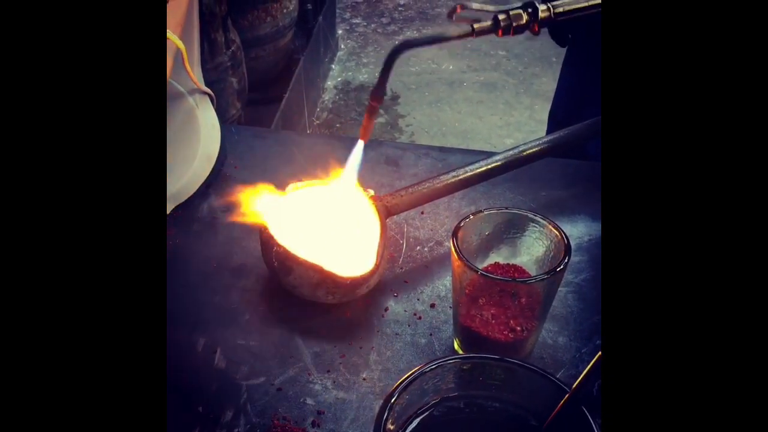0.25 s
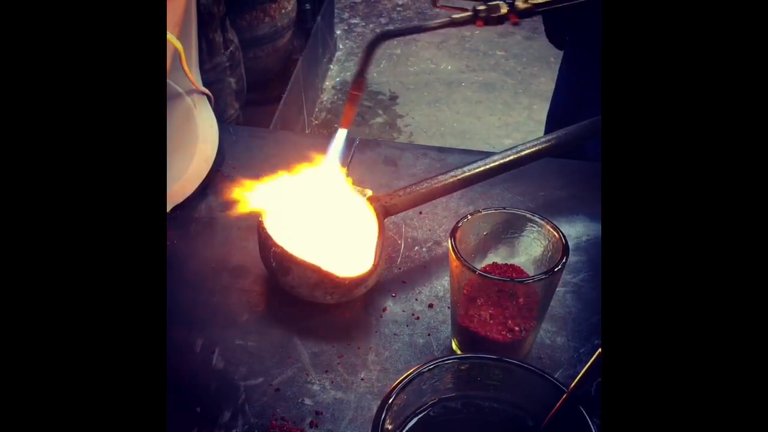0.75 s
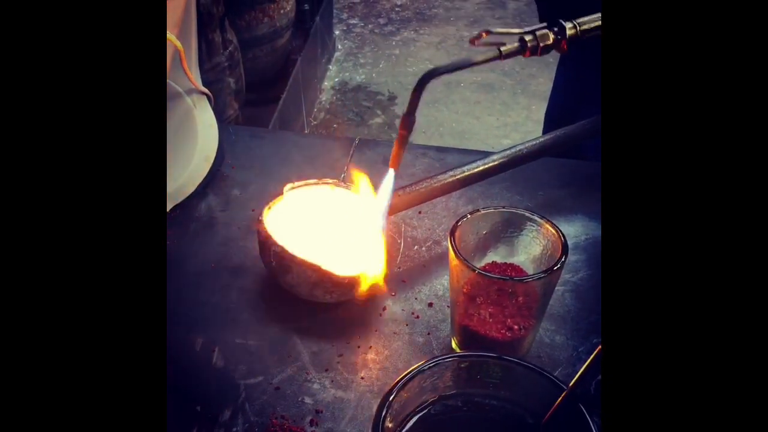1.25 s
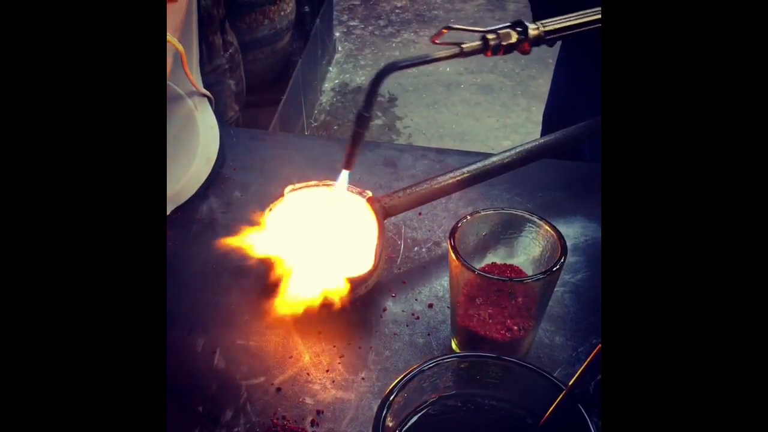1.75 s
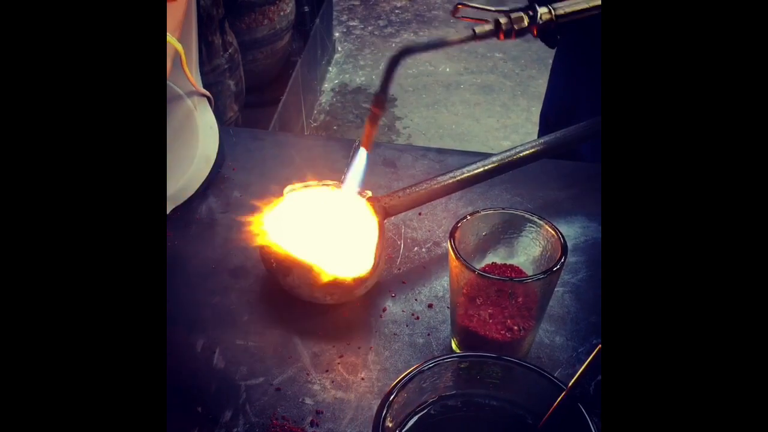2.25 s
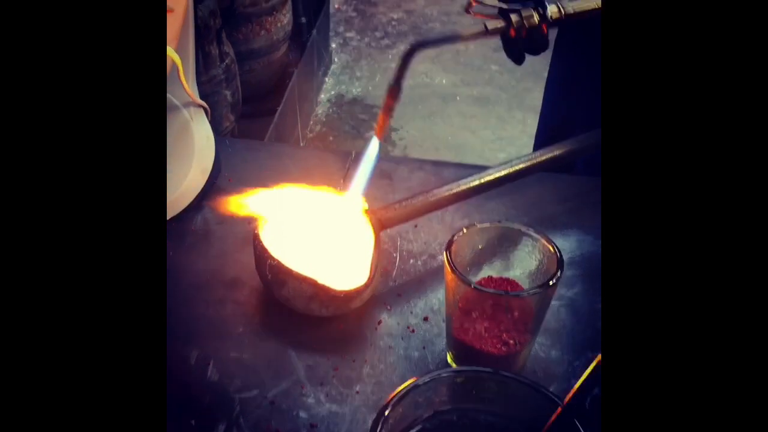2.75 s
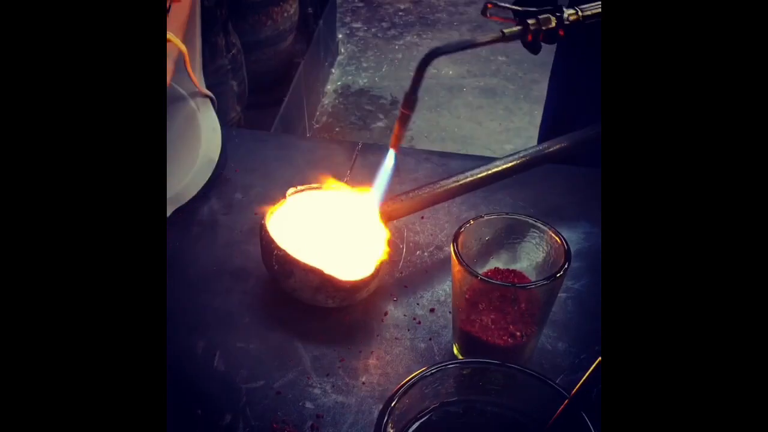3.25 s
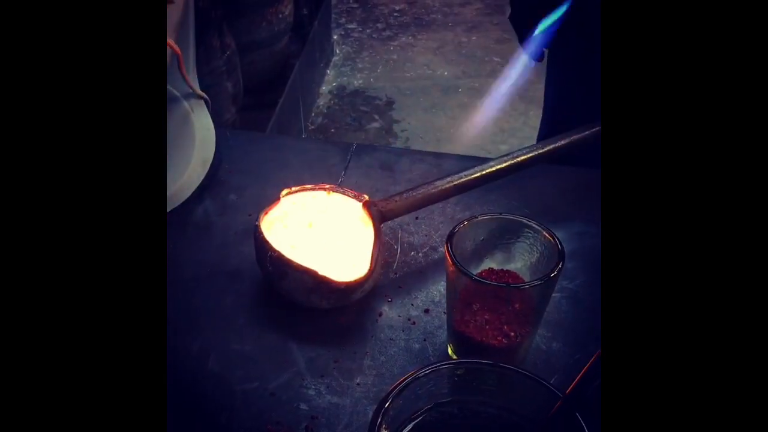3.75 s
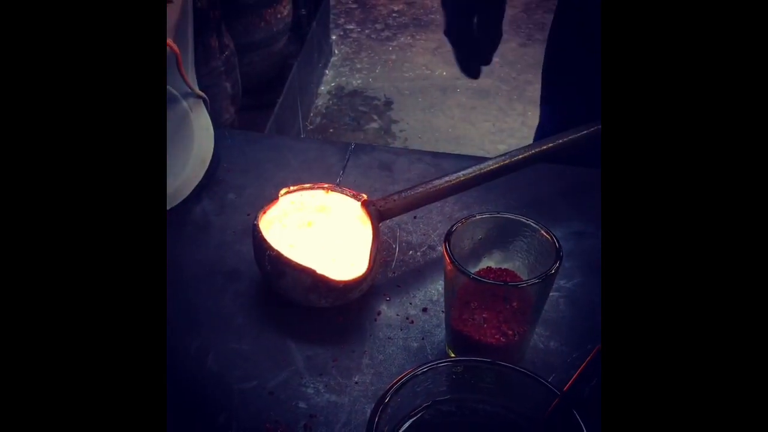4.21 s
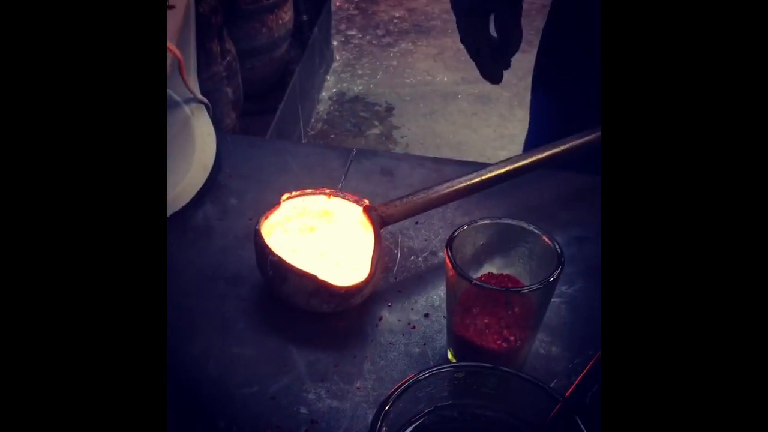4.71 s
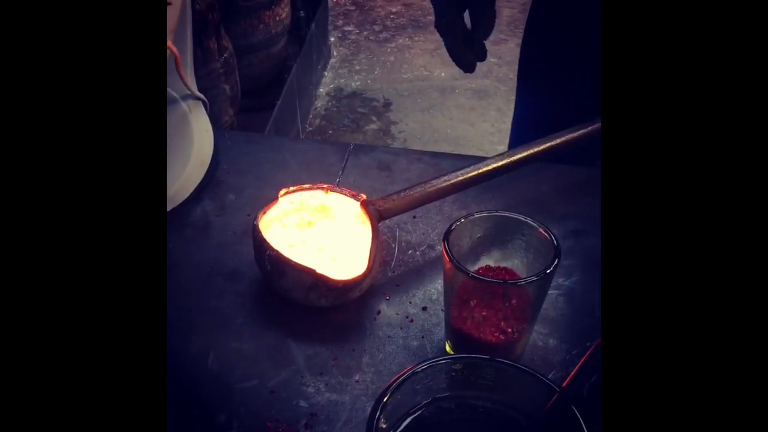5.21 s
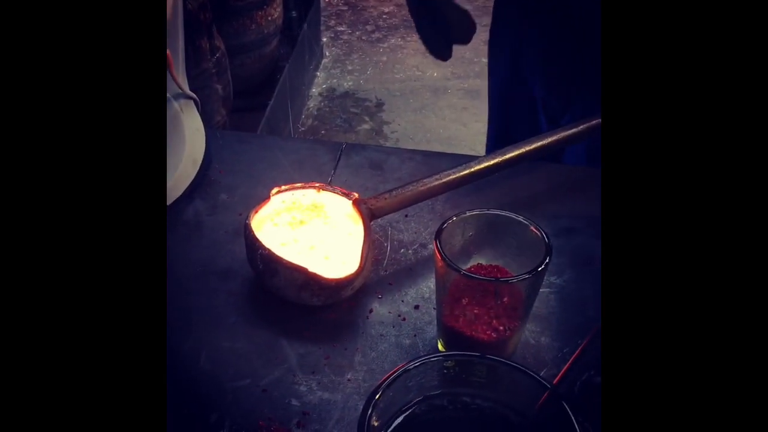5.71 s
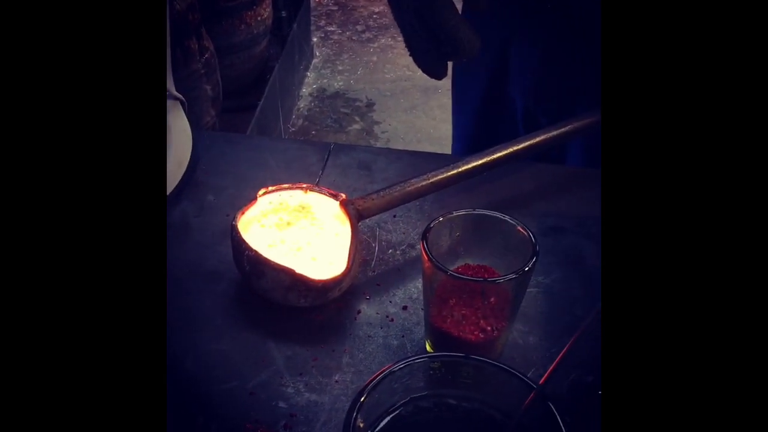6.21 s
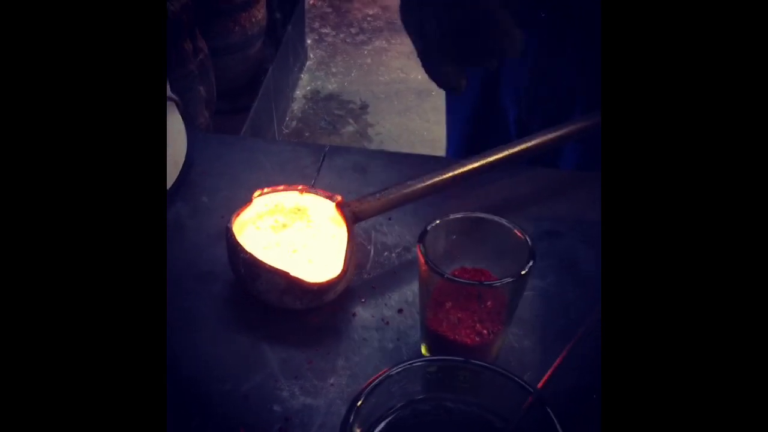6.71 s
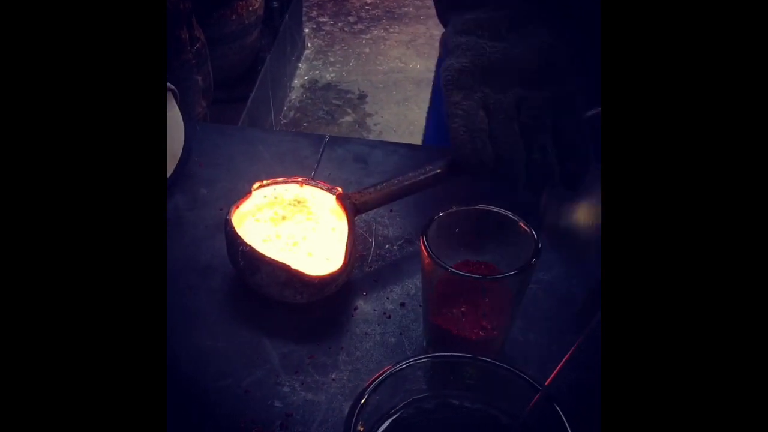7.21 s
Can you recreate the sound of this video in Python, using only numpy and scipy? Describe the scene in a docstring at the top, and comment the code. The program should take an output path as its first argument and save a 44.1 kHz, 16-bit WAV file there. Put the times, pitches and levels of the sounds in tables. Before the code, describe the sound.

A strong, patchy jet of burning gas dominates, with fizzy splashes and wandering whistly colouring. After almost four seconds the flame leaves the bowl and the hiss sweeps through bench and wall reflections. A soft puff drops it to a thin hiss, further puffs end it, and only deep furnace rumble and faint shop air remain until a small cluster of high squeaks and sharp ticks. Mono, slightly boxed microphone, treble cut off at the very top.

```python
"""A metal shop: on a steel bench a gas torch hisses into a glowing crucible and splashes as it circles the rim.
It is lifted away and its two valves are shut in turn; a furnace rumbles throughout, and a metal fitting
squeaks and ticks at the end. Torch, furnace and far shop hiss are shaped noise; valve puffs and ticks are
dying noise bursts, squeaks are unsteady sines. One microphone in a housing, both channels alike."""
import sys
import numpy as np
from scipy import signal
from scipy.fft import rfft, irfft, next_fast_len
from scipy.io import wavfile
from scipy.ndimage import uniform_filter1d, map_coordinates

SR = 44100
rng = np.random.default_rng(int(sys.argv[2]) if len(sys.argv) > 2 else 0)


def materialize(psi):
    """Save the field psi as 16-bit PCM at rate SR to the path in sys.argv[1].

    A 1-D psi becomes a single channel; in a 2-D psi each row is a channel.
    """
    bounded = np.clip(np.atleast_2d(psi).T, -1, 1)
    quanta = np.round(bounded * 32767).astype(np.int16)
    wavfile.write(sys.argv[1], SR, quanta)


def invert_db(x):
    """Field ratio 10**(x/20) for x, a level in decibels (scalar or array-like)."""
    u = np.asarray(x, float) / 20
    return 10 ** u


N = 328986  # samples, about 7.5 s


def unit(x):
    """Scaled to rms 1."""
    return x / np.sqrt(np.mean(x ** 2) + 1e-20)


def along(points, hz):
    """A colour of (Hz, dB) points, read on a log frequency axis."""
    point_hz, level_db = np.transpose(points)
    return np.interp(np.log(hz + 1), np.log(point_hz + 1), level_db)


def curves(rows, t):
    """Each column after the time, read at times t along straight lines."""
    start_s, *columns = np.transpose(rows)
    return [np.interp(t, start_s, column) for column in columns]


def bumps(rows, t):
    """Each column after time and half length, as a sum of smooth bells at times t."""
    centre_s, half_s, *columns = np.transpose(rows)
    bell = np.exp(-((t[:, None] - centre_s) / half_s) ** 2)
    return [bell @ column for column in columns]


def wobble(rate_hz):
    """A smooth random curve through rate_hz random knots a second."""
    knots = rng.standard_normal(int(N * rate_hz / SR) + 4)
    return map_coordinates(knots, [np.arange(N) * rate_hz / SR])


def noise(response):
    """Gaussian noise through a response of frequency, at rms 1."""
    size = next_fast_len(N)
    spectrum = rfft(rng.standard_normal(size)) * response(np.fft.rfftfreq(size, 1 / SR))
    return unit(irfft(spectrum, size)[:N])


def burst(length, colour):
    """A steady stretch of noise with the given gain per frequency, at rms 1."""
    return unit(irfft(rfft(rng.standard_normal(length)) * colour, length))


# hollowness of the jet below the edge, and two wandering resonances, in the bowl and after:
# start_s, hollowness (0 none, 1 full), low_ring_hz, low_ring_db, high_ring_hz, high_ring_db
HOLLOW_AND_RINGS = [(0, 0.54, 3280, 6, 4270, 2), (.3, 0.78, 3340, 3, 4200, 1.5),
                    (.5, 0.43, 3250, -2, 3970, 7), (.7, 0.87, 3120, 1, 4000, -1),
                    (.9, 0.57, 3020, 3, 3750, -3), (1.15, 0.32, 3165, 7.5, 3780, 8),
                    (1.35, 0.55, 3190, 7, 3940, 10.5), (1.5, 0.8, 3190, 4, 3900, 9),
                    (1.7, 0.5, 3030, 2, 4350, 4), (1.9, 0.37, 3300, 2.5, 4050, 1),
                    (2.1, .7, 3050, 10.5, 4200, 0), (2.3, 0.84, 3230, 4.5, 4300, -2),
                    (2.5, .9, 3350, 4, 4350, 4), (2.7, 0.8, 3170, 12, 4350, 0),
                    (2.9, 0.92, 3080, 2, 4300, 3), (3.3, 0.9, 3200, 3, 4070, 1),
                    (3.55, 0.46, 3070, 4, 4070, 4.5), (3.75, 0.55, 3450, 2, 3950, 1),
                    (3.9, 0.5, 3330, 3, 3900, 0), (4.1, 0.34, 3130, 3.5, 3700, -4),
                    (4.3, 0.03, 2780, 4, 3550, 1.5), (4.5, 0, 3030, 1, 3800, -2),
                    (4.7, 0.24, 2800, -6, 4130, -2), (4.9, 0.4, 2580, 5, 4400, 3),
                    (5.1, 0.26, 2880, 6, 4310, 6), (5.27, 0, 3040, 7, 4500, 1), (5.45, 0, 2600, 9, 3850, 0),
                    (5.75, 0.5, 2880, 9, 3850, 3)]
# a deeper wandering resonance of the jet: start_s, ring_hz, ring_db
DEEP_RING = [(0, 1940, 2.5), (.7, 1920, 2), (1.1, 2150, 5), (1.4, 2280, 2.5), (1.9, 2140, 2),
             (2.1, 2000, -5), (2.3, 2310, 3), (2.7, 1980, 5), (3.2, 1880, -3), (3.5, 2240, 2),
             (3.9, 2280, 6), (4.15, 2400, 1), (4.4, 2300, 12.5), (4.9, 2280, 4), (5.1, 2320, 10.5),
             (5.4, 2300, 3)]


def hollow_and_rings_db(f, t):
    """The jet is hollowed below an edge, though the deepest roar escapes; three wandering resonances colour it."""
    swallow_db, edge_hz, wander_hz = -18, 1614, 35
    hollowness, low_hz, low_db, high_hz, high_db = curves(HOLLOW_AND_RINGS, t)
    deep_hz, deep_db = curves(DEEP_RING, t)
    below_edge = 1 / (1 + (f / edge_hz) ** 16)
    escape = 1 - 1.27 / (1 + (f / 430) ** 5.6)
    gain_db = swallow_db * hollowness * below_edge * escape
    frames = np.clip((t * SR).astype(int), 0, N - 1)
    rings = ((deep_hz, deep_db, 60), (low_hz, low_db, 90), (high_hz, high_db, 170))
    for ring_hz, ring_db, half_width_hz in rings:
        # the flickering flame never lets a ring sit still
        wandering_hz = ring_hz + wander_hz * wobble(7)[frames]
        gain_db = gain_db + ring_db / (1 + ((f - wandering_hz) / half_width_hz) ** 2)
    return gain_db


# echo off the bench as the torch is lifted: start_s, lag_ms, level_db (against the direct sound)
BENCH_ECHO = [(3.55, 0.42, -6), (3.7, 0.54, -6), (3.8, 0.73, -13), (3.9, 0.85, -4), (4.03, 1.32, 1),
              (4.2, 1.56, -15), (4.4, 1.4, -18), (4.55, 1.4, -10), (4.75, 1.6, -23)]
# echo off the wall, answering once the flame leaves the bowl: start_s, lag_ms, level_db (against the direct sound)
WALL_ECHO = [(3.9, 2.7, -28), (4.2, 3.4, -12), (4.5, 2.97, -14), (4.9, 3.4, -10), (5.1, 2.95, -2),
             (5.28, 3.06, -9), (5.4, 3.3, -25)]


def echoes(f, t):
    """Bench and wall return delayed copies that comb the jet; rough faces scatter the treble of each."""
    comb = 1
    for rows, edge_hz in ((BENCH_ECHO, 2200), (WALL_ECHO, 3520)):
        lag_ms, level_db = curves(rows, t)
        delay = np.exp(-2j * np.pi * f * lag_ms / 1000)
        comb = comb + invert_db(level_db) * delay / (1 + (f / edge_hz) ** 4)
    return comb


# hiss level and brightness of the jet as it is aimed, then as its valves shut:
# start_s, hiss_db (relative), treble_db (in full above the fizz edge, in part in the upper middle)
JET_LEVEL = [(0, -29.5, -3), (.55, -29, -2.5), (.85, -26.5, -6), (1.1, -29, -2.5), (1.33, -31, 1),
             (1.6, -30.5, 4.5), (2.14, -29.5, 2), (2.41, -30, 3), (2.7, -30.5, 3), (3.19, -30, 1.5),
             (3.52, -31.5, -4), (3.82, -31.5, 0), (3.86, -31, -4), (4.14, -29.5, -9), (4.45, -33, -3),
             (4.88, -29, -1.5), (5.04, -33, -2), (5.2, -30, -4.5), (5.29, -33, 3.5), (5.38, -39.5, 6.5),
             (5.46, -42, 3), (5.51, -46.5, 2), (5.55, -41.5, 0), (5.65, -44.5, 2), (5.69, -42, 0),
             (5.75, -43, 1), (5.8, -50, -2), (5.85, -67, -8)]
# brief changes of the jet's treble, mostly brighter splashes:
# centre_s, half_length_s (to 1/e), sizzle_db (upper middle), fizz_db (top)
TREBLE_CHANGES = [(.09, 0.046, -0.5, -2), (.2, .04, 2.5, -2), (.7, 0.12, 2.5, 3), (.84, 0.078, 1.5, -1),
                  (1.19, 0.074, 3, 2.5), (1.45, 0.091, 7.5, 3.5), (1.79, 0.25, 4.5, 1.5),
                  (2.27, 0.063, 6, 1), (2.55, 0.11, 1.5, 0), (2.8, 0.05, 3, 2), (2.97, 0.084, 3.5, 1),
                  (3.36, 0.079, 6, 5.5), (3.73, 0.16, 4.5, 7.5), (4.05, 0.11, 4, 6), (4.6, 0.071, 0, 0),
                  (5.0, 0.072, 1.5, 3.5), (5.33, 0.11, 5, 3.5), (5.6, 0.096, 6.5, 8)]
# colour of the free jet: freq_hz, level_db (relative)
JET_COLOUR = [(150, -41), (330, -9.5), (500, -8.5), (700, -6), (900, -4.5), (1150, -3.5), (1600, -4.5),
              (2000, -5.5), (2500, -2.5), (3200, -0.5), (4200, -2.5), (5100, -0.5), (6500, -3), (8000, -3),
              (10500, -2.5), (12500, -2.5), (15300, -2)]


def torch():
    """Turbulent jet noise: patchy, with brief treble changes, hollowed and ringing, combed by the echoes."""
    eddies_db = 0.78 * wobble(300) + 0.58 * wobble(30)  # eddies of uneven size, as decibels
    gusty = invert_db(eddies_db) * rng.standard_normal(N)
    hz, t, spectrum = signal.stft(unit(gusty), SR, nperseg=1024, noverlap=896)
    f = hz[:, None] + 1

    hiss_db, treble_db = curves(JET_LEVEL, t)
    sizzle_change_db, fizz_change_db = bumps(TREBLE_CHANGES, t)
    sizzle_db = -1.5 + 0.3 * treble_db + sizzle_change_db  # the upper middle follows the treble in part
    fizz_db = treble_db + fizz_change_db
    hiss_db = hiss_db + 0.35 * sizzle_change_db  # a share of each change reaches the whole hiss
    hiss_db = hiss_db - 900 * np.clip(t - 5.88, 0, 1)  # the gas is off

    # sizzle fades in above 4200 Hz and gives way to fizz above 9500 Hz
    high = np.clip(np.log(f / 4200) / .5, 0, 1)
    top = np.clip(np.log(f / 9500) / 0.13, 0, 1)
    tilt_db = (high - top) * sizzle_db + top * fizz_db

    # random level in small patches of pitch and time, and in broader bands
    patches = uniform_filter1d(rng.standard_normal(spectrum.shape), size=3, axis=0)
    patches = uniform_filter1d(patches, size=50, axis=1)
    patch_db = 2.2 * unit(patches) / (1 + (f / 11000) ** 2)
    flutter = uniform_filter1d(rng.standard_normal(spectrum.shape), size=16, axis=0)
    flutter_db = 1.03 * unit(uniform_filter1d(flutter, size=30, axis=1))

    colour_db = along(JET_COLOUR, f) + hollow_and_rings_db(f, t) + tilt_db
    gain = invert_db(colour_db + patch_db + flutter_db + hiss_db + 9.5) * echoes(f, t)
    return signal.istft(spectrum * gain, SR, nperseg=1024, noverlap=896)[1][:N]


# burner drive: start_s, level_db (rms of the rumble before its unevenness)
BURNER = [(0, -36), (.4, -37), (1.16, -33), (1.9, -36.5), (2.4, -38), (3.3, -38.5), (3.8, -31.5),
          (4.5, -27), (5.4, -31.5), (6.2, -30.5), (7.46, -27.5)]
# uneven rumble level, random ups and downs of narrow-band noise, held at typed times:
# centre_s, half_length_s (to 1/e), level_db (change)
UNEVEN_RUMBLE = [(.12, 0.036, 4), (1.16, .08, 2), (1.45, 0.033, 1), (1.72, 0.039, 8), (2.27, 0.091, 7),
                 (2.39, 0.063, -9), (2.64, 0.19, 5.5), (3.09, 0.15, 8), (4.0, .1, -0.5), (4.47, 0.052, -8),
                 (4.69, 0.054, 0.5), (5.88, 0.058, 6.5), (6.9, 0.091, -7), (7.06, 0.023, 7),
                 (7.2, 0.17, -4)]
# chamber resonances: freq_hz, width_hz, level_db (relative)
CHAMBER_MODES = [(42, 6, -7), (52.3, 6.5, -0.5), (62.8, 6.5, 1), (77.6, 12, -5)]
# colour of the roar: freq_hz, level_db (per Hz, relative)
ROAR_COLOUR = [(53, -17), (90, -4), (140, -4.5), (215, -8.5), (357, -17.5), (524, -22), (611, -19),
               (842, -21.5), (923, -22.5), (1400, -22), (2310, -30), (3050, -53), (3500, -39), (4550, -65),
               (7700, -120)]


def furnace():
    """The burner drives the chamber's low resonances and a falling roar above them."""
    t = np.arange(N) / SR
    burner_db, uneven_db = curves(BURNER, t)[0], bumps(UNEVEN_RUMBLE, t)[0]

    def chamber(f):
        """Resonances of alternating sign, cut below 42 Hz and above 120 Hz."""
        total = 0
        for k, (mode_hz, width_hz, level_db) in enumerate(CHAMBER_MODES):
            damping = 1j * f * width_hz
            total = total + (-1) ** k * invert_db(level_db) * damping / (mode_hz ** 2 - f * f + damping)
        return total * f ** 4 / (f ** 4 + 42 ** 4) / (1 + (f / 120) ** 4)

    rumble = invert_db(burner_db + uneven_db) * noise(chamber)
    # the roar follows the burner in part, with slow random wobbles
    roar_db = -39 + 0.66 * (burner_db - burner_db.mean())
    roar_db = roar_db + 0.59 * wobble(8) + 1.8 * wobble(3.904)
    return rumble + invert_db(roar_db) * noise(lambda f: invert_db(along(ROAR_COLOUR, f)))


# far hiss of the shop: freq_hz, level_db (per Hz, relative)
SHOP_COLOUR = [(1470, -38), (2500, -3), (2620, -7), (3060, -6), (3450, -9), (4290, -13.5), (6380, -15),
               (7190, -16.5), (15000, -15.5)]


def shop_air():
    """A faint, smooth far hiss: steady coloured noise at -48 dB rms."""
    return invert_db(-48) * noise(lambda f: invert_db(along(SHOP_COLOUR, f)))


# gas puffs as a valve closes: start_s, level_db (before rise and decay), t60_s
VALVE_PUFFS = [(5.277, -17, 0.05), (5.545, -33, .06), (5.757, -26, 0.091), (5.773, -22.5, 0.036),
               (5.871, -33, .05), (5.89, -34, .02)]
# colour of a puff: freq_hz, level_db (relative)
PUFF_COLOUR = [(500, -12), (900, -9), (1800, 0), (3000, 3.5), (4500, -3), (7000, -1.5), (12000, -3.5),
               (15500, -14)]


def valves():
    """Each puff is a soft, quickly dying breath of gas: coloured noise with a 2 ms rise."""
    out, t = np.zeros(N + SR), np.arange(SR // 10) / SR
    colour = invert_db(along(PUFF_COLOUR, np.fft.rfftfreq(len(t), 1 / SR)))
    for start_s, level_db, t60_s in VALVE_PUFFS:
        envelope = invert_db(level_db - 60 * t / t60_s) * (1 - np.exp(-t / 0.002))
        out[round(start_s * SR):][:len(t)] += envelope * burst(len(t), colour)
    return out[:N]


# each rub excites the modes near its own pitch: start_s, length_s, pitch_hz, level_db (before the mode's own)
RUBS = [(6.663, .02, 12500, -37), (6.668, .02, 9700, -38), (6.674, .03, 14200, -34),
        (6.678, .04, 7400, -43), (6.68, .035, 10300, -40), (6.692, .028, 12600, -33),
        (6.71, 0.023, 6340, -40), (6.723, 0.021, 13250, -24), (6.747, .018, 13100, -43),
        (6.793, .015, 14100, -44)]
# what the metal fitting sings on: mode_hz, level_db (relative)
FITTING_MODES = [(5800, -4), (6700, -1), (7300, -4), (9700, -4), (10050, -5), (12100, -4), (13050, 1),
                 (13950, 0)]


def fitting_squeaks():
    """Rubbing metal: unsteady modes under a short swell, strongest near the pitch of the rub."""
    reach_hz = 600  # how far from its pitch a rub still excites a mode
    out, t = np.zeros(N + SR), np.arange(SR // 10) / SR
    for start_s, length_s, pitch_hz, level_db in RUBS:
        swell = np.sin(np.pi * np.clip(t / length_s, 0, 1)) ** 0.91
        for mode_hz, mode_db in FITTING_MODES:
            slip = np.cumsum(rng.normal(0, 0.072, len(t)))  # stick and slip smear the pitch
            near = np.exp(-((mode_hz - pitch_hz) / reach_hz) ** 2)
            tone = np.sin(2 * np.pi * mode_hz * t + slip)
            out[round(start_s * SR):][:len(t)] += invert_db(level_db + mode_db) * near * swell * tone
    return out[:N]


# sharp contacts of metal: start_s, level_db (relative), t60_s, tilt_db (per octave)
CONTACTS = [(6.663, -36, .06, 6), (6.69, -38, .1, 6), (6.712, -24, 0.022, 0.5), (6.719, -25, 0.032, 1),
            (6.729, -28.5, 0.067, 3), (6.735, -24, 0.036, 7), (6.741, -31, .02, -4), (6.778, -38, .04, 3),
            (6.797, -37, 0.063, 2), (6.843, -31, 0.033, 0), (6.864, -35, .02, 1), (6.874, -38, .02, 1),
            (7.11, -42, .06, 0)]
# colour of a tick before its tilt: freq_hz, level_db (relative)
TICK_COLOUR = [(600, -32), (1800, -4), (3500, -6), (7000, -1.5), (12000, 0), (15500, -0.5)]


def fitting_ticks():
    """Metal contacts: dying bursts of noise with a 1.1 ms rise, tilted dull or bright about 7 kHz."""
    out, t = np.zeros(N + SR), np.arange(SR // 10) / SR
    f = np.fft.rfftfreq(len(t), 1 / SR) + 1
    for start_s, level_db, t60_s, tilt_db in CONTACTS:
        colour = invert_db(along(TICK_COLOUR, f) + tilt_db * np.log2(f / 7000))
        envelope = invert_db(level_db + 1.5 - 60 * t / t60_s) * (1 - np.exp(-t / 0.0011))
        out[round(start_s * SR):][:len(t)] += envelope * burst(len(t), colour)
    return out[:N]


def scene():
    """All sources reach the single microphone, which feeds both channels."""
    gas = torch() + valves()
    mix = gas + furnace() + shop_air() + fitting_squeaks() + fitting_ticks()
    return np.tile(mix, (2, 1))


# dips and bumps of the microphone in its housing: freq_hz, width_hz (full, at half the dB), level_db
HOUSING_COLOUR = [(139.4, 3.4, 8.5), (118, 7.2, 4.5), (183, 11, 1.5), (195, 8.2, -1.5), (210.3, 9.9, 3.5),
                  (495, 80, 1), (1446, 120, -4), (2480, 72, -3.5), (3210, 82, 0), (3500, 130, -1),
                  (5080, 270, -4), (6080, 300, 2.5), (6670, 200, 3), (7800, 420, -1), (9470, 300, 2),
                  (10700, 1700, -2.5)]


def microphone(dry):
    """The housing's resonances colour everything, and the band ends sharply at 15310 Hz."""
    size = next_fast_len(N + 8192)
    f = np.fft.rfftfreq(size, 1 / SR)
    colour_db = 0
    for freq_hz, width_hz, level_db in HOUSING_COLOUR:
        colour_db = colour_db + level_db / (1 + (2 * (f - freq_hz) / width_hz) ** 2)
    return irfft(rfft(dry, size) * invert_db(colour_db) * (f < 15310), size)[:, :N]


def low_pass(x):
    """Removes everything above the highest recorded frequency."""
    return signal.sosfilt(signal.butter(12, 16520, fs=SR, output="sos"), x)


def record(dry):
    """The finished mix, heard through the microphone in its housing."""
    heard = microphone(dry)
    return low_pass(heard)


dry = scene()
out = record(dry)
materialize(out)
```